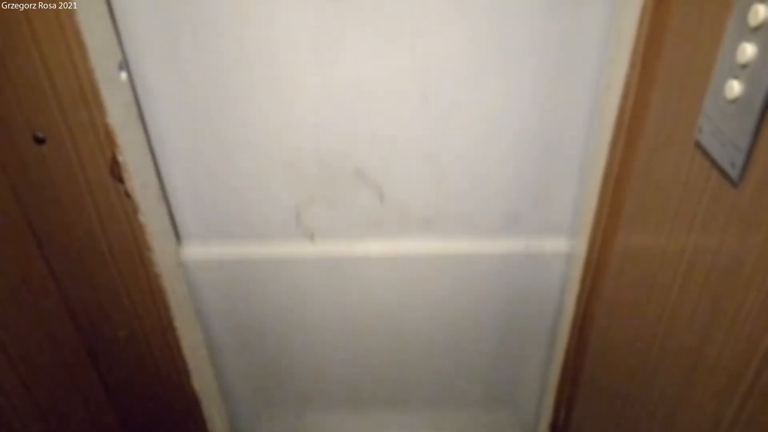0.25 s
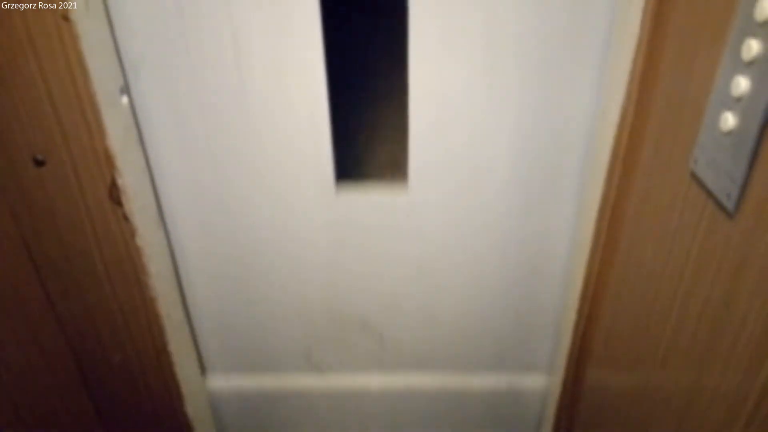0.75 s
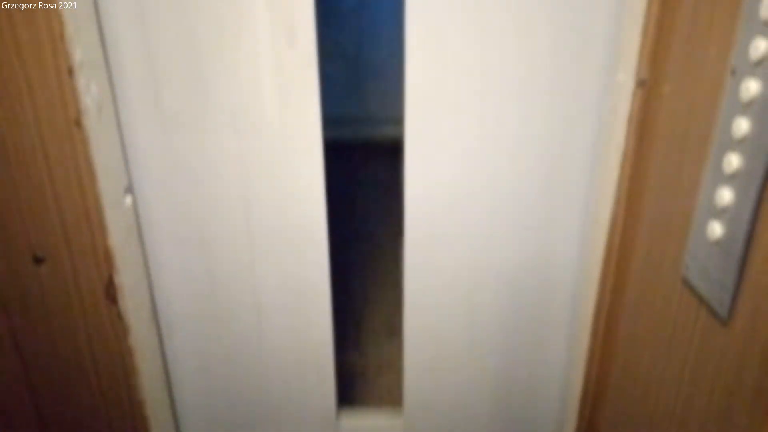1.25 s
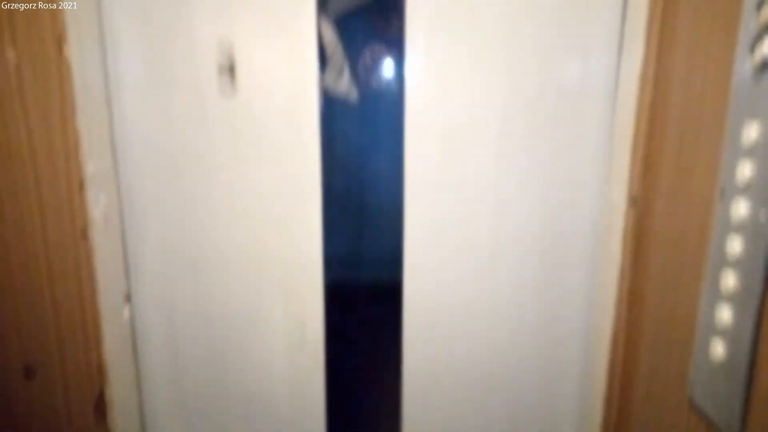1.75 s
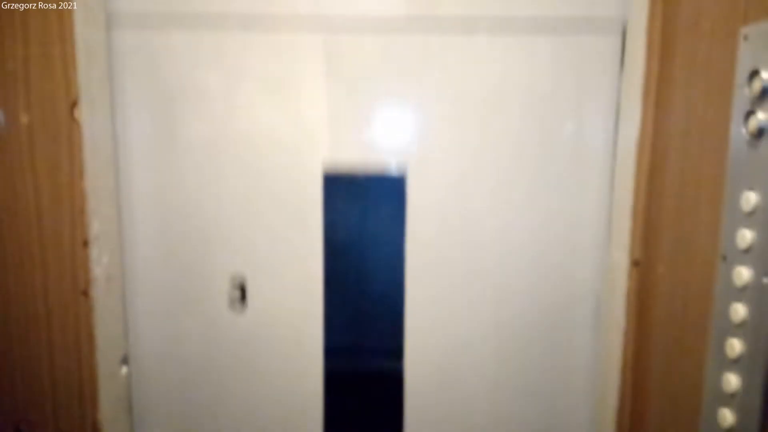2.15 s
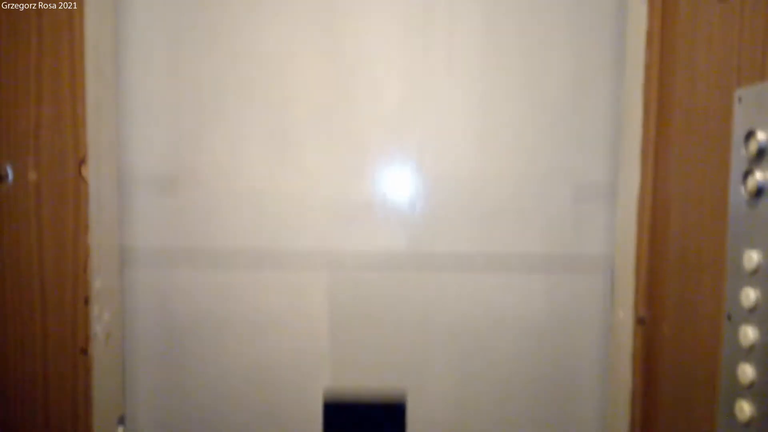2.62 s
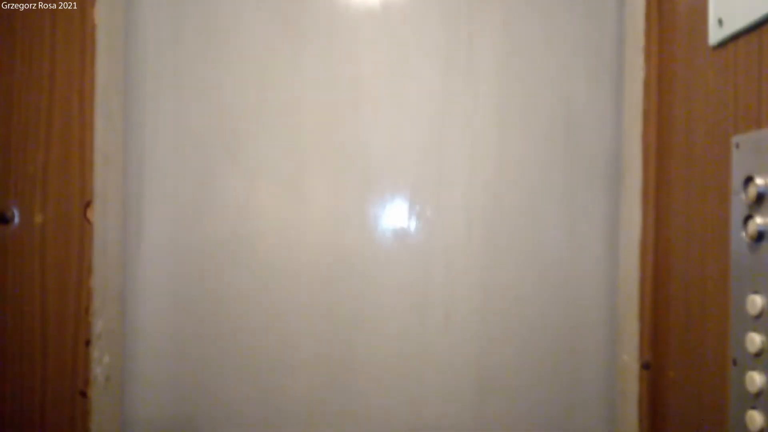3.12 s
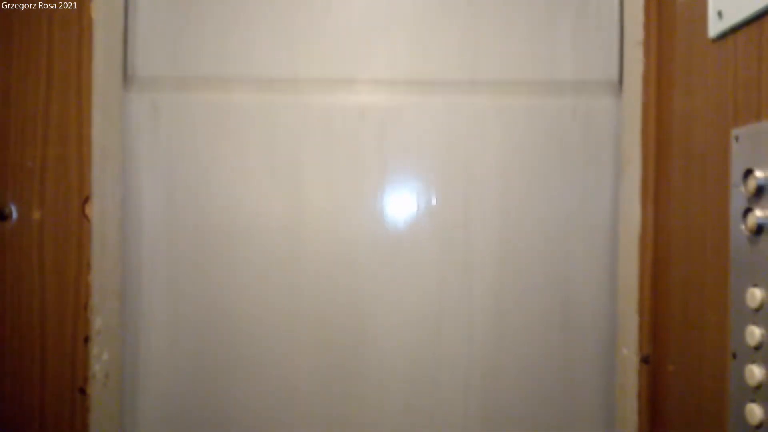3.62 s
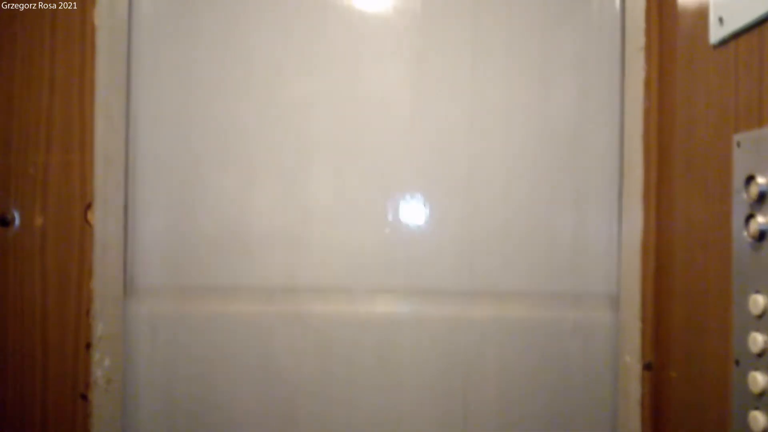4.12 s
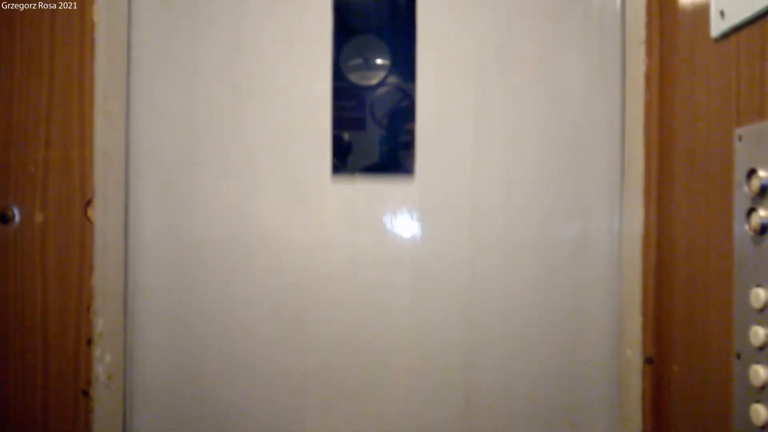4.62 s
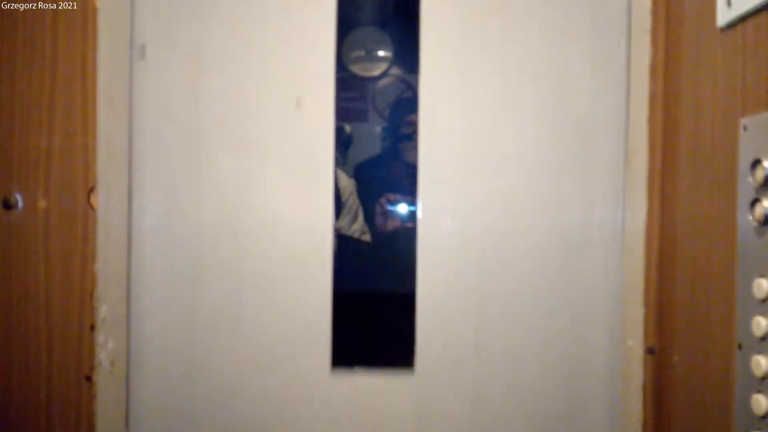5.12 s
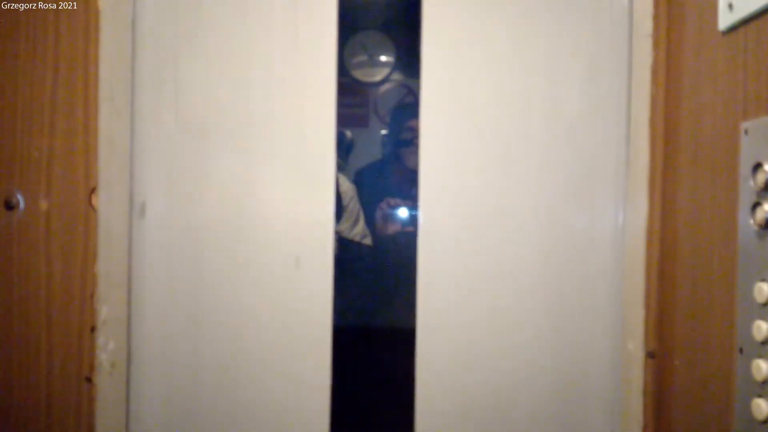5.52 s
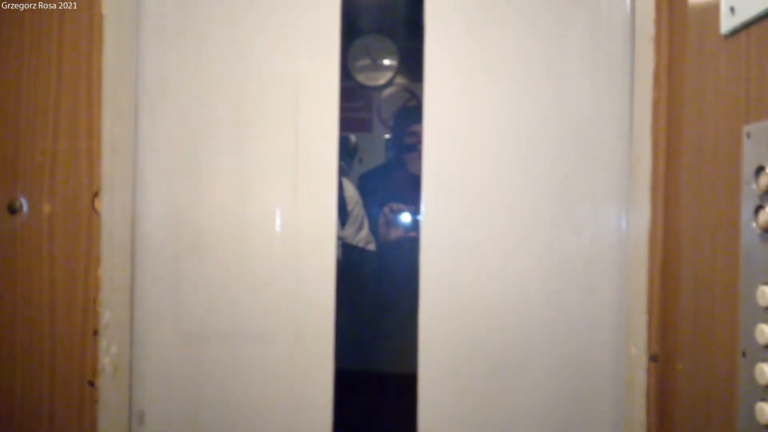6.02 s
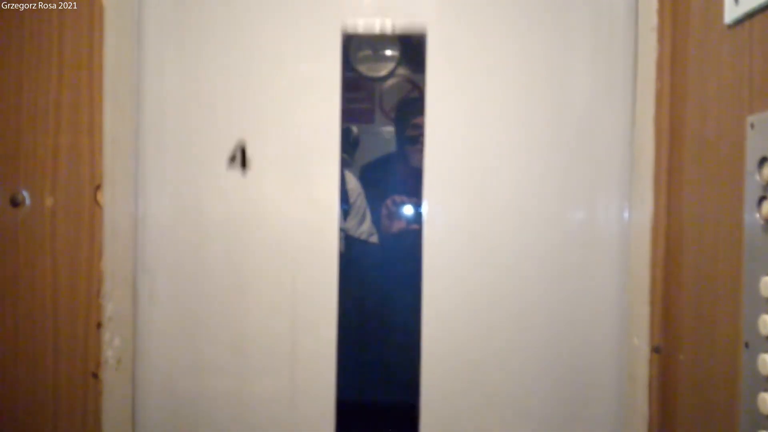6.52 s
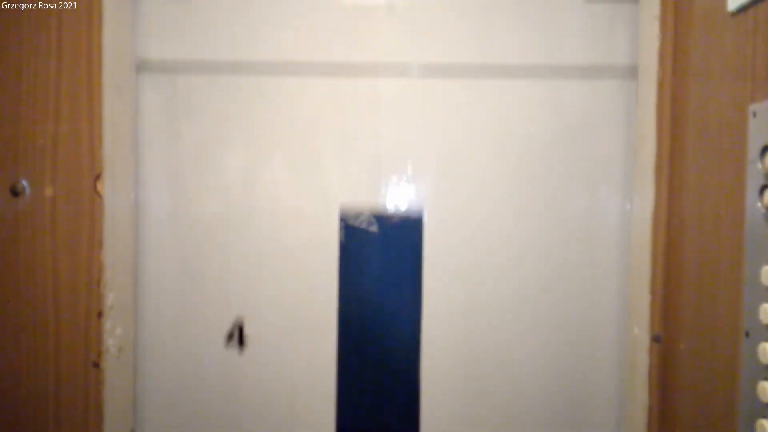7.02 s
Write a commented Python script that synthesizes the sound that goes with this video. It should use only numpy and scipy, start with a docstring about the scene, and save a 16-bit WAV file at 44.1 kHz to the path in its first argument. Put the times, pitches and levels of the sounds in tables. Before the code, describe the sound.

An old lift travels upward, humming and rumbling, while steel doors and locks rattle and clack, with the loudest clattering burst near the end.

```python
"""Inside an old wooden lift cabin that climbs its shaft past steel landing doors. Noise through cabin
resonances makes the boom and rumble; a tone with two sidebands is the gear hum above. Dense tiny knocks, shaped
by spectra and patchy in time, make guide shoes hiss and doors and locks rattle; shorter clatters make blows,
squeaks and thuds, and steel modes ring them on. A thin lamp whine drifts down over the deep rumble and a faint
broadband hiss."""
import sys
import numpy as np
from scipy import signal
from scipy.fft import rfft, irfft, next_fast_len
from scipy.io import wavfile
from scipy.ndimage import uniform_filter1d

SR = 44100
rng = np.random.default_rng(int(sys.argv[2]) if len(sys.argv) > 2 else 0)


def dump(signal):
    """Clip the signal to [-1, 1] and save it as 16-bit WAV at the path in sys.argv[1]."""
    limited = np.clip(np.atleast_2d(signal).T, -1, 1)
    pcm = np.round(limited * 32767).astype(np.int16)
    wavfile.write(sys.argv[1], SR, pcm)


N = 319945  # samples


def gain_of(db):
    """Level law: 20 dB is a factor of ten in amplitude."""
    return 10 ** (np.asarray(db) / 20)


def evened(x):
    """Normalisation: scales to unit rms, so that levels can be set in dB."""
    return x / np.sqrt(np.mean(x ** 2) + 1e-20)


def columns(rows):
    """Linear interpolation: every column of a curve over time, sample by sample."""
    s, *rest = np.transpose(rows)
    return [np.interp(np.arange(N) / SR, s, c) for c in rest]


def colour(x, points):
    """Spectral filtering: shapes x by a curve over log frequency, at -99 dB outside it."""
    hz, db = np.transpose(points)
    size = next_fast_len(len(x))
    log_hz = np.log(np.fft.rfftfreq(size, 1 / SR) + 1)
    gain = gain_of(np.interp(log_hz, np.log(hz), db, -99, -99))
    return irfft(rfft(x, size) * gain, size)[:len(x)]


def resonate(x, hz, width):
    """Damped mode: one complex pole, whose bandwidth in Hz sets how fast it dies away."""
    r = np.exp(-np.pi * width / SR)
    return 2 * signal.lfilter([1 - r], [1, -r * np.exp(2j * np.pi * hz / SR)], x).real


def hummed(modes):
    """Forced vibration: noise passes each mode twice, which steepens its skirts."""
    total = 0
    for hz, width, db in modes:
        once = resonate(rng.standard_normal(N), hz, width)
        total = total + gain_of(db) * evened(resonate(once, hz, width))
    return evened(total)


def grit(per_s, spread_db):
    """Friction as shot noise: dense tiny knocks at random times and of uneven size."""
    size = gain_of(spread_db * np.minimum(rng.exponential(1, N), 4))
    struck = rng.random(N) < per_s / SR
    return evened(size * rng.standard_normal(N) * struck)


def patchy(x, spread_db, bins, frames):
    """Random modulation: narrow bands swell and fade by chance, as loose parts touch and let go."""
    z = signal.stft(x, nperseg=512, noverlap=384)[2]
    slow = uniform_filter1d(rng.standard_normal(z.T.shape), frames, 0)
    patches = evened(uniform_filter1d(slow, bins, 1))  # smoothed over frames, then over bins
    swelling = z * gain_of(spread_db * patches.T)
    return evened(signal.istft(swelling, nperseg=512, noverlap=384)[1][:N])


def stroke(s, hold, db, rise, t60):
    """Exponential decay: the power of one contact rises, holds, then falls by 60 dB in t60."""
    t = np.arange(N) / SR - s
    fall_db = 60 * np.maximum(t - hold, 0) / max(t60, .02)
    return (np.clip(t / rise, 0, 1) * gain_of(db - fall_db)) ** 2


def cabin():
    """Forced resonance: rails and ropes shake walls and panels; a pure tone is the sway on the ropes."""
    # Shaking. Each row: time in seconds, wall boom in dB, panel rumble in dB above the boom.
    shake = [(0.0, -51, 0.5), (0.5, -50.5, -11), (0.56, -40, -3.5), (0.75, -38, -10.5), (1.0, -49, -11),
             (1.11, -46, -12.5), (1.57, -49, -1), (1.69, -41.5, -4.5), (2.02, -47, -9), (2.6, -45.5, -11.5),
             (4.48, -48, -4.5), (5.3, -46.5, -6), (6.15, -45.5, -9.5), (6.58, -42.5, 1), (6.7, -47.5, 0.5),
             (7.25, -44.5, -11.5)]
    # Modes of the cabin walls, then of the wooden panels. Each row: centre in Hz, width in Hz, level in dB.
    walls = [(83.9, 10.3, -2), (98.6, 14.8, -4), (126.4, 50, -8.5)]
    panels = [(174.55, 19.7, 0), (209.1, 18.6, 1), (237.8, 49, -0.5), (294.4, 99, -2), (410, 17.5, -11),
              (506, 9.2, -35.5)]
    # Spectrum of the shaft's rumble. Each row: frequency in Hz, relative level in dB per Hz.
    deep_spectrum = [(16, -22), (28, -11.5), (45, -7.5), (62, 1.5), (75, -8)]
    deep_level_db = -61
    sway_hz, sway_level_db = 49.7, -54
    sway_from_s, sway_to_s, sway_edge_db_per_s = 3.96, 5.4, 58

    boom_db, panels_above_db = columns(shake)
    t = np.arange(N) / SR
    outside_s = np.maximum(np.maximum(sway_from_s - t, t - sway_to_s), 0)
    sway_gain = gain_of(sway_level_db - sway_edge_db_per_s * outside_s)
    sway = sway_gain * np.sqrt(2) * np.sin(2 * np.pi * sway_hz * t)
    deep = gain_of(deep_level_db) * evened(colour(rng.standard_normal(N), deep_spectrum))
    shaken = hummed(walls) + gain_of(panels_above_db) * hummed(panels)
    return gain_of(boom_db) * shaken + sway + deep


def gear():
    """Modulation sidebands: a tooth mesh tone with one tone a shaft rate either side, each wavering slowly."""
    # Hum of the worm gear. Each row: time in seconds, level in dB.
    gear_level = [(0.0, -60), (1.1, -69.5), (2.12, -59), (2.93, -59.5), (3.35, -67), (4.91, -57),
                  (6.3, -59), (7.25, -65)]
    mesh_hz, shaft_hz = 343.3, 17
    out = np.zeros(N)
    for step, side_db in [(0, 0.029), (-1, -8.5), (1, -5.5)]:  # sideband number, level in dB
        smooth = uniform_filter1d(rng.standard_normal(N), 3000)
        waver = evened(signal.lfilter([1], [1, -np.exp(-8 / SR)], smooth))
        turns = (mesh_hz + step * shaft_hz) * np.arange(N) / SR + rng.random()
        out += gain_of(side_db + 2 * waver) * np.sin(2 * np.pi * turns)
    return np.sqrt(2) * gain_of(columns(gear_level)[0]) * out


def rubbing():
    """Friction noise: door sheets rustle and shoes hiss; rattles shake sheet, locks and small loose parts."""
    # Steady sliding. Each row: time in seconds, sheet rustle drive in dB, shoe hiss in dB.
    slide = [(0.0, -65, -78), (0.08, -68, -81), (0.25, -71.5, -71), (0.7, -75, -86), (0.87, -71, -66.5),
             (1.05, -73.5, -89), (1.7, -66.5, -73.5), (2.1, -56.5, -71), (2.48, -69.5, -78.5),
             (2.95, -74, -82.5), (3.41, -66, -80.5), (3.59, -69.5, -74.5), (3.68, -74, -86),
             (4.24, -84, -87), (4.52, -61.5, -85.5), (5.2, -67, -87.5), (6.2, -70, -90.5), (7.25, -70, -83)]
    # Parts dragging past. Each row: start in seconds, hold in seconds, sheet drive in dB, lock drive in dB,
    # jingle in dB, sheet brightness from 0 to 1, t60 of the sheet in seconds.
    rattles = [(0.528, 0.026, -58.5, -74, -99, 0, 0.7), (1.336, 0.094, -45, -49.5, -66, 0.07, 0.5),
               (1.489, 0.11, -50, -57.5, -88, 0.32, 0.36), (1.589, 0.1, -45.5, -56, -90, 0.27, 0.22),
               (2.038, 0.042, -58.5, -64, -89, 1, 1), (3.851, 0.025, -49, -89, -99, 0.15, 0.87),
               (4.56, .12, -45, -51.5, -87, 0.74, 0.8), (5.053, 0.07, -59.5, -91, -99, 0.7, 0.24),
               (5.228, 0.087, -50, -65.5, -97, 0.84, 0.73), (5.465, 0.12, -55, -76, -99, 0.82, 1),
               (5.561, 0.065, -78, -55.5, -76.5, .5, 0.4), (5.647, 0.026, -59, -51, -71, 0.2, .5),
               (6.259, 0.15, -43.5, -51, -71, 0.02, .5), (6.404, 0.14, -39, -48, -71.5, 0.01, 1),
               (6.592, 0.084, -41.5, -39.5, -58, 0.46, 0.45), (6.835, 0.083, -41.5, -49, -80, 0.53, 0.69)]
    # The smallest parts. Each row: start in seconds, hold in seconds, level in dB.
    tinkles = [(1.346, .03, -73), (1.413, 0.018, -76), (5.59, .03, -70), (5.656, .02, -72),
               (6.44, 0.033, -79), (6.602, 0.044, -59.5)]
    # Spectra of sheet shaken, sheet scraped, light sliding, hard lock rattle, small loose parts and
    # the smallest of them. Each row: frequency in Hz, relative level in dB per Hz.
    sheet_spectrum = [(250, -19), (420, 2.5), (469, 2.5), (515, -3), (717, -2), (1140, -2), (1830, -14),
                      (3200, -22.5), (4160, -66), (7040, -120)]
    scrape_spectrum = [(290, -26), (500, -23.5), (534, -4), (841, -7), (960, -7), (1540, 0), (3600, -22),
                       (4680, -24), (7920, -120)]
    shoe_spectrum = [(1530, -33), (2600, -22), (3470, -9), (3780, -3), (4170, -6), (5990, 1.5), (7440, -7),
                     (9500, -20), (12400, -18), (20900, -120)]
    lock_spectrum = [(1500, -35), (2200, -1.5), (3100, -6), (3700, 0.5), (4900, -5.5), (6000, -5),
                     (7700, -21), (8600, -70), (10000, -51)]
    jingle_spectrum = [(6500, -13), (8000, -3.5), (10000, -7), (11000, -26)]
    tinkle_spectrum = [(9500, -14), (11500, -5), (13000, -5), (15800, -2)]
    slide_bright = 0.3  # share of the rustle's power that scrapes
    rise_s, sheet_rise_s = 0.017, 0.031  # locks and loose parts rise faster than the sheet
    lock_share, jingle_share = 0.36, 0.25  # they die in these shares of the t60
    tinkle_t60_s = 0.16

    # powers of the contacts
    rustle_db, shoe_db = columns(slide)
    rustle = gain_of(rustle_db) ** 2
    dull, sharp = (1 - slide_bright) * rustle, slide_bright * rustle
    locks = parts = 0
    for s, hold, sheet_db, lock_db, jingle_db, bright, t60 in rattles:
        sheet = stroke(s, hold, sheet_db, sheet_rise_s, t60)
        bright = np.clip(bright, 0, 1)
        dull = dull + (1 - bright) * sheet
        sharp = sharp + bright * sheet
        locks = locks + stroke(s, hold, lock_db, rise_s, lock_share * t60)
        parts = parts + stroke(s, hold, jingle_db, rise_s, jingle_share * t60)
    smallest = sum(stroke(*row, rise_s, tinkle_t60_s) for row in tinkles)

    # textures of unit rms
    shaken = patchy(colour(grit(5000, 0.74), sheet_spectrum), 3.67, bins=2, frames=12)
    scraped = patchy(colour(grit(5000, 0.61), scrape_spectrum), 4.4, bins=2, frames=12)
    shoe = patchy(colour(grit(9000, 0.7), shoe_spectrum), 4.2, bins=3, frames=10)
    lock = patchy(colour(grit(7000, 0.96), lock_spectrum), 3.86, bins=4, frames=9)
    jingle = patchy(colour(grit(9000, 0.8), jingle_spectrum), 4.3, bins=3, frames=10)
    tinkle = patchy(colour(grit(9000, 0.8), tinkle_spectrum), 3.0, bins=3, frames=10)

    # sheet, locks and clacks ring the steel; shoes and loose parts are heard directly
    struck = np.sqrt(abs(dull)) * shaken + np.sqrt(abs(sharp)) * scraped + np.sqrt(locks) * lock
    direct = gain_of(shoe_db) * shoe + np.sqrt(parts) * jingle + np.sqrt(smallest) * tinkle
    return ring(gain_of(-2.5) * struck + clacks()) + direct


def ring(x, direct_db=-3):
    """Modal superposition: the resonances of the steel add their ringing to a rough drive."""
    # Modes of doors and locks. Each row: centre in Hz, width in Hz, gain in dB.
    steel = [(468, 8, -7.5), (845.4, 5.5, 3), (1038, 23, -2.5), (1175, 17.6, 0), (1280, 16, -5.5),
             (1406, 11.5, 1.5), (1568, 26, -8.5), (1738, 21, 1.5), (1932, 17, 3.5), (2370, 14, -4),
             (3315, 16, 1.5), (3788, 26, -5.5), (4520, 11.5, 4), (4840, 61, -15), (5680, 23.3, 3),
             (7030, 34, 0)]
    ringing = sum(gain_of(db) * resonate(x, hz, width) for hz, width, db in steel)
    return gain_of(direct_db) * x + ringing


def whine():
    """Narrow-band noise: low-passed noise on a carrier gives a fuzzy, flickering line that drifts down."""
    # Whine of the cabin lamp. Each row: time in seconds, frequency in Hz.
    whine_hz = [(0.0, 10990), (7.25, 10790)]
    fuzz = resonate(resonate(rng.standard_normal(N), 0, 150), 0, 150)
    line = fuzz * np.cos(2 * np.pi * np.cumsum(columns(whine_hz)[0]) / SR)
    return gain_of(-83.5) * patchy(line, 1.3, bins=1, frames=14)


def hiss():
    """Broadband noise: a faint steady hiss across the spectrum, with bands that flicker."""
    # Spectrum of the hiss. Each row: frequency in Hz, relative level in dB per Hz.
    hiss_spectrum = [(420, -28), (480, -7), (620, -13.5), (1180, -11), (1950, -15.5), (2720, -22),
                     (5900, -32), (9000, -34.5), (13500, -31), (14500, -29), (15800, -18)]
    return gain_of(-77) * patchy(colour(rng.standard_normal(N), hiss_spectrum), 6.2, bins=3, frames=16)


def clacks():
    """Impact excitation: a clatter of knocks holds, then dies, coloured by the part that is struck."""
    # Single blows on steel. Each row: start in seconds, drive level in dB, centre in Hz,
    # spread in octaves, t60 in seconds.
    blows = [(0.206, -62, 1300, 0.37, 0.74), (.539, -54, 1806, .1, 0.25), (.617, -72, 6400, .13, .08),
             (1.345, -53, 1140, 0.14, 0.73), (1.499, -51, 1320, 0.83, 0.15), (1.616, -44.5, 4300, 0.48, .1),
             (1.67, -56, 4000, 0.37, .1), (2.062, -59, 1680, 0.49, 1), (2.272, -61.5, 4900, 0.31, 0.12),
             (3.097, -55, 1245, 0.073, .3), (3.548, -64, 1880, 0.37, 0.43), (3.702, -51.5, 940, 0.51, 0.46),
             (3.862, -48.5, 1320, 0.47, 0.44), (5.66, -52.5, 5400, 0.24, 0.34),
             (5.754, -64.5, 5600, .25, 0.23), (6.243, -56, 1220, 0.14, 0.5),
             (6.343, -53.5, 4430, 0.6, 0.11), (6.501, -41.5, 3900, 0.53, 0.08),
             (6.628, -34.5, 1280, 0.27, 0.28)]
    # Squeaks and rubs. Each row: start in seconds, drive level in dB, centre in Hz,
    # spread in octaves, hold in seconds, t60 in seconds.
    squeaks = [(0.537, -74, 3060, .045, .046, .15), (1.337, -56, 3630, 0.24, 0.11, 0.17),
               (1.52, -56.5, 1127, 0.026, 0.12, 0.3), (3.003, -58, 1205, 0.15, 0.26, 0.14),
               (4.555, -62.5, 6750, .057, 0.047, 0.26), (4.572, -53, 2050, 0.42, 0.08, 0.62),
               (4.902, -62.5, 1213, .06, 0.097, .2), (5.24, -61.5, 2320, 0.31, 0.055, 0.45),
               (6.617, -49.5, 7540, 0.035, 0.027, .09), (6.827, -56, 5770, 0.28, 0.048, 0.42)]
    # Dull thuds through the cabin, with the columns of the blows.
    thuds = [(.546, -47.5, 410, 0.075, 0.26), (0.554, -41.5, 185, 0.077, 0.7),
             (2.287, -42.5, 206, 0.32, 0.4), (3.713, -56, 517, 0.22, .26), (3.867, -43.5, 422, 0.11, 0.21),
             (4.076, -43.5, 200, 0.28, 0.36), (5.599, -53, 444, 0.26, 0.41), (5.885, -56, 470, 0.14, .23),
             (6.514, -35.5, 248.4, 0.077, 0.29)]
    blow_hold_s, thud_hold_s = 0.0071, 0.027

    rows = [(s, db, hz, spread, blow_hold_s, t60) for s, db, hz, spread, t60 in blows]
    rows += squeaks
    rows += [(s, db, hz, spread, thud_hold_s, t60) for s, db, hz, spread, t60 in thuds]
    lead = SR // 20  # room for the filter's response ahead of the contact
    out = np.zeros(N + SR)
    knocks = grit(8000, 3.1)
    t = (np.arange(SR // 2) - lead) / SR
    octave = np.log2(np.fft.rfftfreq(len(t), 1 / SR) + 1)
    for s, db, hz, spread, hold, t60 in rows:
        at = round(s * SR) - lead
        band = np.exp(-.5 * abs((octave - np.log2(hz)) / max(spread, .03)) ** 1.88)
        fall_db = 60 * np.maximum(t - hold, 0) / max(t60, .02)
        rise = np.clip(t / (0.15 * hold + 0.00088), 0, 1)  # long rubs start softly
        drive = np.roll(knocks, -at)[:len(t)] * rise
        drive += 8.8 * (t == 0) * (hold < .045)  # short ones open with a hard blow
        out[at:at + len(t)] += irfft(rfft(gain_of(db - fall_db) * drive) * evened(band), len(t))
    return out[:N]


def scene():
    """Linear superposition: all sources in the cabin add up in one channel."""
    return (cabin() + gear() + rubbing() + whine() + hiss())[None]


def record(dry):
    """Band limiting: a steep linear-phase low-pass at 15750 Hz."""
    low_pass = signal.firwin(1023, 15750, window=("kaiser", 10), fs=SR)
    return signal.oaconvolve(dry, low_pass[None], "same")


dry = scene()
out = record(dry)
dump(out)
```